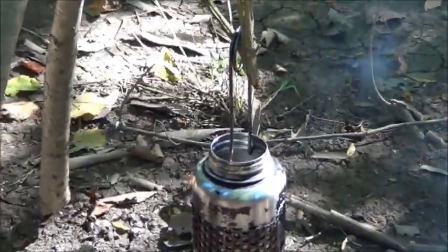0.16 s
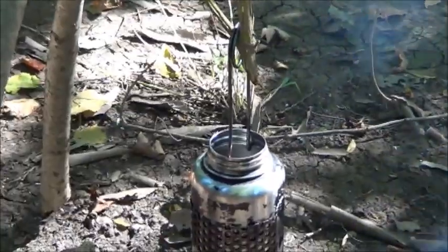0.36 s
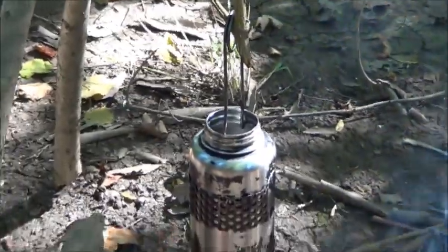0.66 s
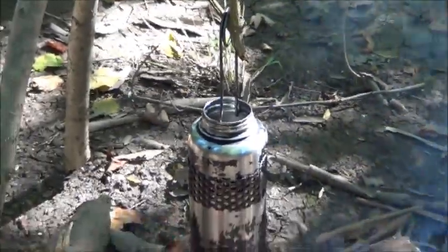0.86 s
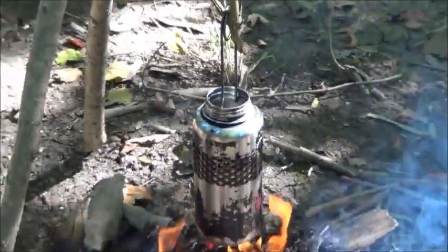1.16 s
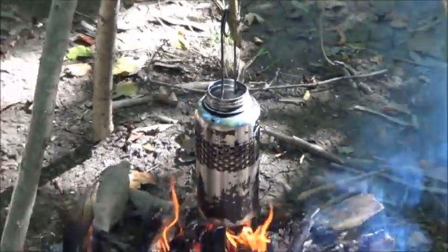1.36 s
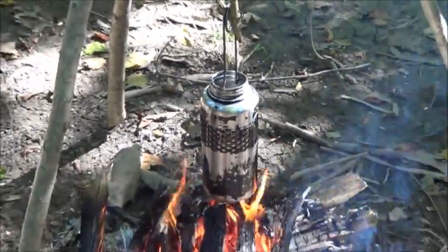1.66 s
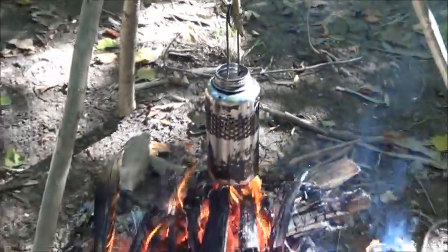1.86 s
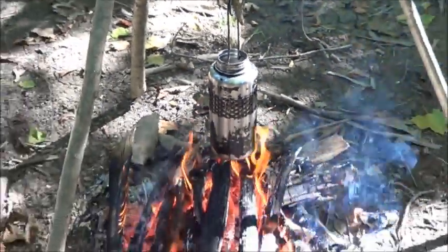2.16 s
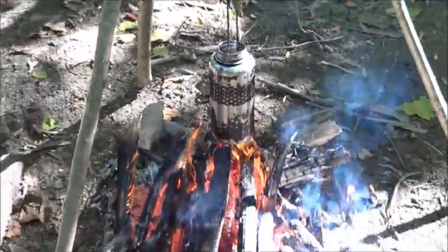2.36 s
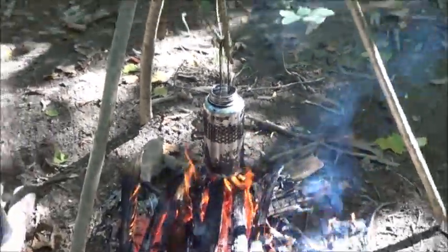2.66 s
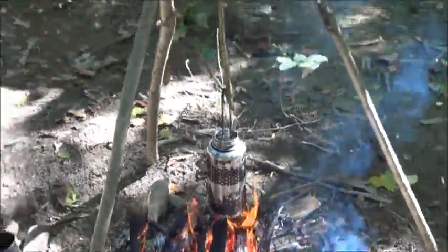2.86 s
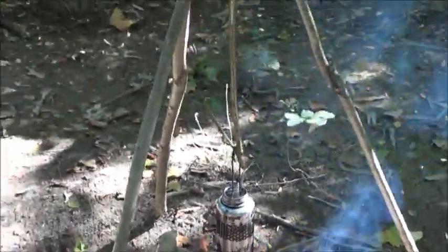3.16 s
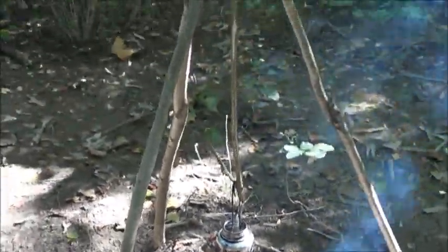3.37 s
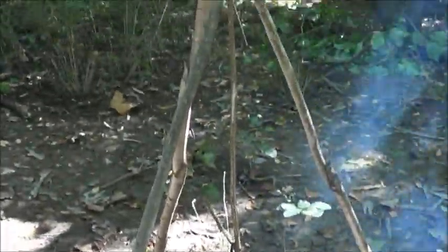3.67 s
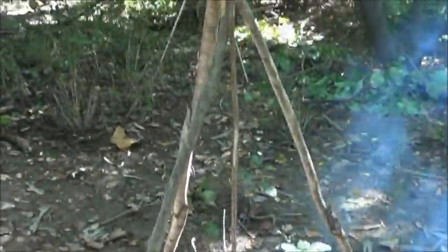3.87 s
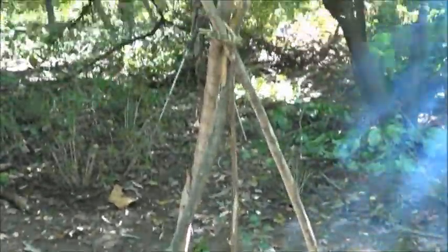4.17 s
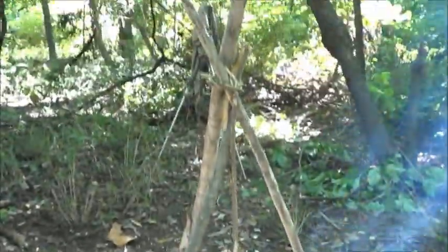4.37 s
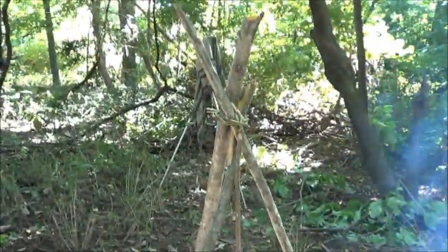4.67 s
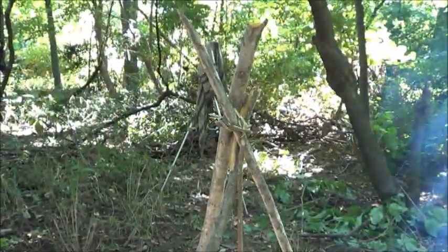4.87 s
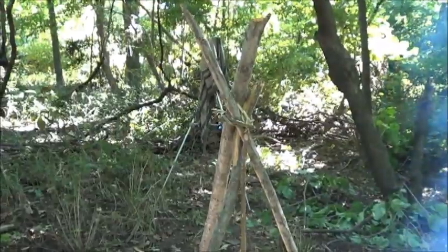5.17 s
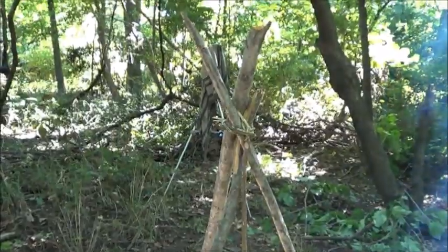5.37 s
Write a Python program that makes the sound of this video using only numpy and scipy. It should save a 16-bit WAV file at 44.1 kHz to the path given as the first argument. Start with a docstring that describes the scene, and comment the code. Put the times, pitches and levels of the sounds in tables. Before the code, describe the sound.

A dense, high, steady chorus of crickets trills in daytime woodland while a small campfire ticks and snaps, and a fly briefly buzzes past.

```python
"""Woodland by day: throughout, a dense chorus of crickets, toned pulses near 7 kHz, trills over soft air noise.
From the start a small campfire ticks and snaps as decaying rings, and a camera hums and whines in sine tones.
The level starts ducked and creeps up; gain control ducks at the two sharpest snaps, near 1.5 s and 4.9 s.
Just after 5 s a low buzz, wingbeat harmonics like a fly's, brushes past the microphone."""
import sys
import numpy as np
from scipy import signal
from scipy.fft import rfft, irfft
from scipy.io import wavfile
from scipy.ndimage import uniform_filter1d, minimum_filter1d

SR = 44100
rng = np.random.default_rng(int(sys.argv[2]) if len(sys.argv) > 2 else 0)


def store_pcm(level_fs):
    """Save levels as 16-bit WAV."""
    pcm = np.round(np.clip(level_fs, -1, 1) * 32767).astype(np.int16)
    wavfile.write(sys.argv[1], SR, np.atleast_2d(pcm).T)


N = 242991
T = np.arange(N) / SR  # time in seconds

# Nearest crickets. Each row: mean wing tone in Hz, mean strokes per second, level in dB before the chorus gain.
NEAR_CRICKETS = [(7414, 42, -33), (6430, 31, -54.5), (6700, 43, -39), (7090, 48, -34)]
# Loudest snaps of the burning wood. Each row: start in seconds, crack peak in dB, crack tone in Hz,
# crack decay constant in ms, wood peak in dB, wood tone in Hz.
SNAPS = [(.1047, 1.5, 9430, 0.068, -5, 4700), (1.4548, 6, 17200, .11, -3, 9700),
         (1.6652, -7.5, 12280, .1, -30, 4500), (2.94, -5, 11200, 0.0928, -28.5, 4500),
         (3.592, -2, 6337, 0.024, -9, 1800), (4.0153, -6, 11200, 0.06094, -17, 4632),
         (4.2289, -16, 10840, 0.095, -22, 892.7), (4.2935, -6.5, 12060, 0.0814, -18, 4500),
         (4.6441, -12, 11400, 0.09248, -28, 4500), (4.7606, -24, 11000, .1, -25, 1800),
         (4.9082, 5.5, 13140, 0.065, -16.5, 2800), (4.9158, -2, 11950, .067, -15, 5533)]
# Spectrum of fire rumble, leaves and the hiss of far insects, before the slow gains.
# Each row: frequency in Hz, mid density in dB per Hz, side density in dB per Hz.
AIR_SPECTRUM = [(20, -83, -114.3), (40, -68, -106.2), (70.32, -65.5, -99), (132.84, -63, -77.5),
                (244, -68, -74.5), (401.1, -73.5, -72.5), (895, -76, -73), (1668.3, -77.5, -78),
                (2643.7, -76.0, -85), (4119, -73.5, -87), (5470, -72, -86), (9600, -65, -81.5),
                (12100, -72, -89.5), (15640, -74, -93)]
# Gain of the rumble and hum over time. Each row: time in seconds, gain in dB.
RUMBLE_GAIN = [(0, 0.5), (1.1, -0.5), (2, 1), (2.8, 1.5), (3.4, -1.5), (4.6, -3), (5.5, -2)]
# Camera hum. Each row: mean frequency in Hz, rms level in dB before the rumble gain.
HUM = [(52, -51.5), (95, -47.5)]

CHORUS_HZ, CHORUS_WIDTH_HZ = 7165, 450  # centre and standard deviation of the power over pitch
CHORUS_SIDE_DB = -4.5  # side relative to mid
CHORUS_DB, CHORUS_RISE_DB_PER_S = 2.0, .12  # a steady gain that grows very slowly
WOOD_DECAY_RATIO = 2.54  # the wood rings this much longer than the crack
# faint ticks between the snaps: most are near the lowest level, a few reach the top of the range
TICK_DB, TICK_RANGE_DB, TICK_DECAY_MS = -22.5, 13.5, 0.13
TICK_LOW_HZ, TICK_HIGH_HZ = 9072, 13173
# the fly's buzz: one swell, with a brief closest moment inside it
FLY_START_S, FLY_ATTACK_S, FLY_HOLD_S, FLY_RELEASE_S = 5.068, .032, 0.047, 0.017
FLY_DB, WINGBEAT_HZ = -19, 163
CLOSEST_S, CLOSEST_WIDTH_S, CLOSEST_DIP_HZ = 5.115, 0.0135, 32
OVERTONES_FAR_DB, OVERTONES_CLOSE_DB = -20, 1.5  # relative to the wingbeat tone
WHINE_HZ, WHINE_DB = 15734, -52
CEILING_DB, START_DUCK_DB, RECOVERY_DB_PER_S = -1, 8.5, 2.5
TOP_HZ = 15800  # upper edge of the passband


def amp(db):
    """Amplitude ratio is ten to the power of decibels over twenty."""
    return 10 ** (np.asarray(db) / 20)


def level(x, db):
    """Scaling by the root mean square sets the mean power."""
    return x * amp(db) / np.sqrt(np.mean(x ** 2))


def curves(table):
    """Linear interpolation turns each column of a table into a curve in time."""
    s, *columns = np.transpose(table)
    return [np.interp(T, s, c) for c in columns]


def colour(x, hz, db):
    """Spectral weighting: gains given at points on a log-frequency axis multiply the transform."""
    f = np.maximum(np.arange(N // 2 + 1) * SR / N, 1)
    gain = amp(np.interp(np.log(f), np.log(hz), db))
    return irfft(rfft(x) * gain, N)


def walk(rate):
    """Slow fluctuation: random levels held 1 / rate s, smoothed by two moving averages, spread 1."""
    k = int(SR / rate)
    held = np.repeat(rng.standard_normal(N // k + 1), k)
    w = uniform_filter1d(uniform_filter1d(held, k), k)[:N]
    return w / w.std()


def stereo(mid, side):
    """Sum and difference of mid and side give left and right."""
    return np.array([mid + side, mid - side])


def scatter(x, t60, delay, side_db):
    """Diffuse reflection: exponentially decaying noise, of unit mid energy, is convolved after a delay."""
    t = np.arange(int((t60 + delay) * SR)) / SR - delay
    decay = (t > 0) * np.exp(-np.log(1000) * t / t60)  # falls 60 dB in t60 seconds
    mid, side = rng.standard_normal((2, len(t))) * decay
    response = stereo(mid, amp(side_db) * side) / np.sqrt(np.sum(mid ** 2))
    return signal.fftconvolve(x[None], response, axes=1)[:, :N]


def cricket(hz, rate, glide, duty=0.5963, waver_db=2.0, force_db=7, drift=.008):
    """Stridulation: each stroke draws a scraper over a file, a short tone that sags as the wing slows."""
    strokes = rng.random() + np.cumsum(rate * (1 + .05 * walk(6))) / SR
    u = np.minimum(strokes % 1 / duty, 1)  # progress through the sounding part of a stroke
    # every stroke starts afresh and has its own force
    start, force = rng.random((1024, 2))[strokes.astype(int) % 1024].T
    tone_hz = hz * (1 + glide * (.5 - u) + drift * walk(20))
    phase = 2 * np.pi * np.cumsum(tone_hz) / SR + 2 * np.pi * start
    pulse = np.sin(np.pi * u) * np.sin(phase)
    return level(pulse * amp(waver_db * walk(20) + force_db * force), 0)


def chorus(count=22, crowd_db=-24.5, far_db=-25, echo_db=-4.5, shimmer_db=0.4):
    """Incoherent superposition: near crickets and a crowd, echoed by the trees, over a far blur of noise."""
    def share_db(hz):
        """Wing tones cluster in a bell curve around the common pitch."""
        return -10 / np.log(10) * .5 * ((hz - CHORUS_HZ) / CHORUS_WIDTH_HZ) ** 2

    crowd = 0
    for k, hz in enumerate(CHORUS_HZ + CHORUS_WIDTH_HZ * np.linspace(-2.7, 2.6, count)):
        song = cricket(hz, rng.uniform(25, 75), glide=.06, duty=.5) * amp(share_db(hz))
        crowd = crowd + stereo(song, song * amp(CHORUS_SIDE_DB) * (-1) ** k)  # left and right in turn
    near = sum(amp(db) * cricket(hz, rate, glide=.02) for hz, rate, db in NEAR_CRICKETS)
    direct = level(crowd, crowd_db) + near
    echoes = amp(echo_db) * scatter(direct.mean(0), t60=0.31, delay=0.0095, side_db=CHORUS_SIDE_DB / 2)

    band_hz = np.linspace(4000, 10000, 61)
    mid, side = colour(rng.standard_normal((2, N)), band_hz, share_db(band_hz))
    far = level(stereo(mid, amp(CHORUS_SIDE_DB) * side), far_db)
    effort_db = CHORUS_DB + CHORUS_RISE_DB_PER_S * T
    return (direct + echoes + far) * amp(effort_db + shimmer_db * walk(50))


def ring(s, db, hz, decay_ms):
    """Damped resonance: an impulsive burst rings briefly at its place in time."""
    t = np.arange(256) / SR
    shape = np.gradient(t * np.exp(-1000 * t / decay_ms) * np.sin(2 * np.pi * hz * t))
    out = np.zeros(N + len(t))
    i = int(np.clip(s * SR, 0, N))
    out[i:i + len(t)] = amp(db) * shape / np.abs(shape).max()
    return out[:N]


def fire(count=66, ground_db=-13):
    """Impulse excitation: sap pockets burst and crack, wood answers lower, logs and ground scatter the click."""
    clicks = np.zeros(N)
    for s, db, hz, ms, wood_db, wood_hz in SNAPS:
        clicks += ring(s, db, hz, ms)
        clicks += ring(s, wood_db, wood_hz, ms * WOOD_DECAY_RATIO)
    for when, size, pitch in rng.random((count, 3)):
        tick_db = TICK_DB + TICK_RANGE_DB * size ** 3
        tick_hz = TICK_LOW_HZ + pitch * (TICK_HIGH_HZ - TICK_LOW_HZ)
        clicks += ring(when * N / SR, tick_db, tick_hz, TICK_DECAY_MS)
    return clicks + amp(ground_db) * scatter(clicks, t60=0.019, delay=0.0015, side_db=1.0)


def fly(count=5, second_db=-14, fall_db=-4, echo_db=-10):
    """Periodic wingbeats form a harmonic series; at the closest point pitch dips and overtones carry."""
    swell_s = FLY_START_S + np.cumsum([0, FLY_ATTACK_S, FLY_HOLD_S, FLY_RELEASE_S])
    swell = np.interp(T, swell_s, [0, 1, 1, 0])
    nearness = 1 / (1 + ((T - CLOSEST_S) / CLOSEST_WIDTH_S) ** 2)
    hz = WINGBEAT_HZ - CLOSEST_DIP_HZ * nearness
    overtone_db = OVERTONES_FAR_DB + (OVERTONES_CLOSE_DB - OVERTONES_FAR_DB) * nearness
    phase = 2 * np.pi * np.cumsum(hz * (1 + 0.023 * walk(150))) / SR
    upper = sum(amp(second_db + fall_db * k) * np.cos((k + 3) * phase) for k in range(count - 2))
    upper = upper * (1 + 0.88 * walk(300))  # stirred air roughens them
    beat = amp(FLY_DB) * swell * np.cos(phase)
    overtones = amp(FLY_DB + overtone_db) * swell * (np.cos(2 * phase) + upper)
    echoes = amp(echo_db) * scatter(overtones + .3 * beat, t60=.6, delay=0.0185, side_db=-1)
    return beat + overtones + echoes


def camera_hum():
    """Frequency modulation: low sine tones wander slowly in pitch."""
    hum = np.zeros(N)
    for hz, db in HUM:
        phase = 2 * np.pi * np.cumsum(hz * (1 + 0.0269 * walk(10))) / SR
        hum += np.sqrt(2) * amp(db) * np.sin(phase)
    return hum


def camera_whine():
    """A pure tone: one steady sinusoid near the top of hearing."""
    return np.sqrt(2) * amp(WHINE_DB) * np.sin(2 * np.pi * WHINE_HZ * T)


def background(rumble_hz=220, flutter_db=1.0, air_db=0, low_db=-1):
    """Filtered noise: woodland air splits into a smooth hiss and a fluttering rumble, joined by the camera."""
    hz, mid_db, side_db = np.transpose(AIR_SPECTRUM)
    mid, side = rng.standard_normal((2, N)) * np.sqrt(SR / 2)  # unit power per Hz
    air = stereo(colour(mid, hz, mid_db), colour(side, hz, side_db))
    low = signal.sosfiltfilt(signal.butter(2, rumble_hz, fs=SR, output="sos"), air)
    # the flames make the low end flutter, while the distant hiss varies less
    hiss = (air - low) * amp(air_db + 0.45 * walk(10))
    rumble = low * amp(low_db + flutter_db * walk(13))
    rumble_db, = curves(RUMBLE_GAIN)
    return hiss + (rumble + camera_hum()) * amp(rumble_db) + camera_whine()


def scene():
    """Linear superposition of crickets, fire, fly and background."""
    return chorus() + fire() + fly() + background()


def record(dry):
    """Peak limiting: gain ducks just ahead of a peak and recovers slowly; a low-pass cuts the top."""
    ahead = int(.02 * SR)
    over_db = 20 * np.log10(np.abs(dry).max(0) + 1e-9) - CEILING_DB
    over_db = -minimum_filter1d(-over_db, 2 * ahead)  # running maximum
    recovered_db = RECOVERY_DB_PER_S * T
    # a peak that needs more ducking sets a new depth, which then wears off at a steady rate
    depth_db = np.maximum.accumulate(np.maximum(over_db + recovered_db, START_DUCK_DB))
    duck_db = np.maximum(depth_db - recovered_db, 0)
    gain = amp(-uniform_filter1d(duck_db, ahead // 2))
    low_pass = signal.ellip(10, .2, 80, TOP_HZ, fs=SR, output="sos")
    return signal.sosfilt(low_pass, dry * gain)


dry = scene()
out = record(dry)
store_pcm(out)
```